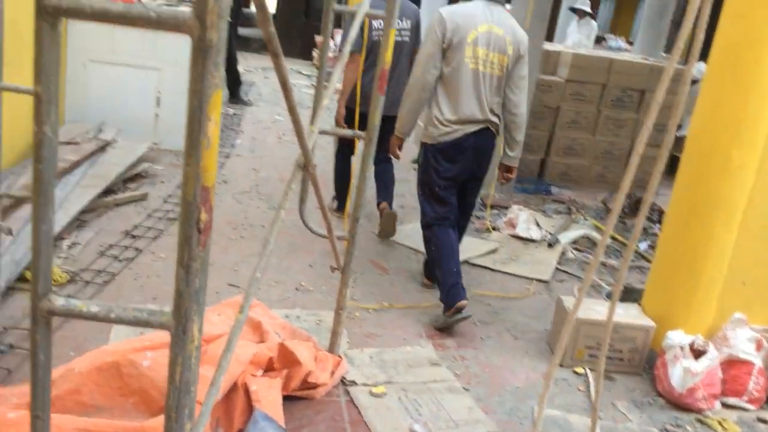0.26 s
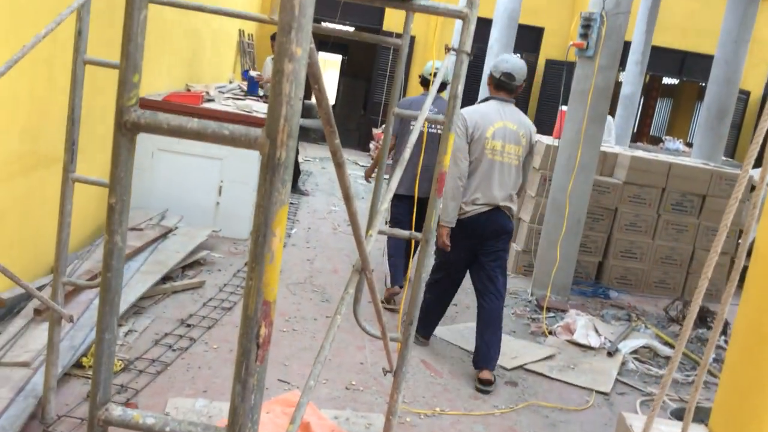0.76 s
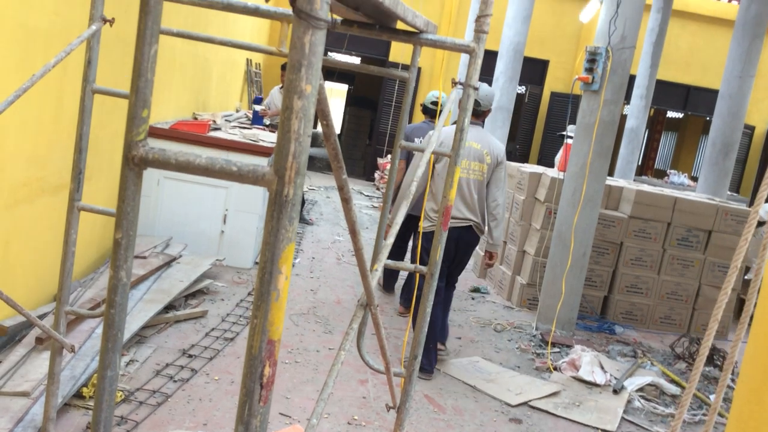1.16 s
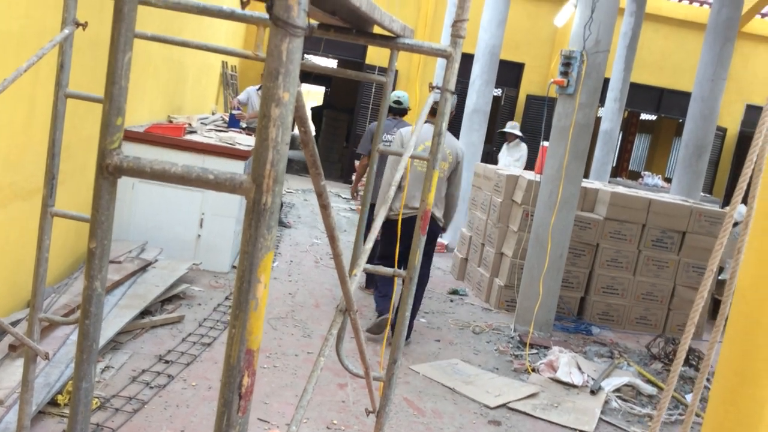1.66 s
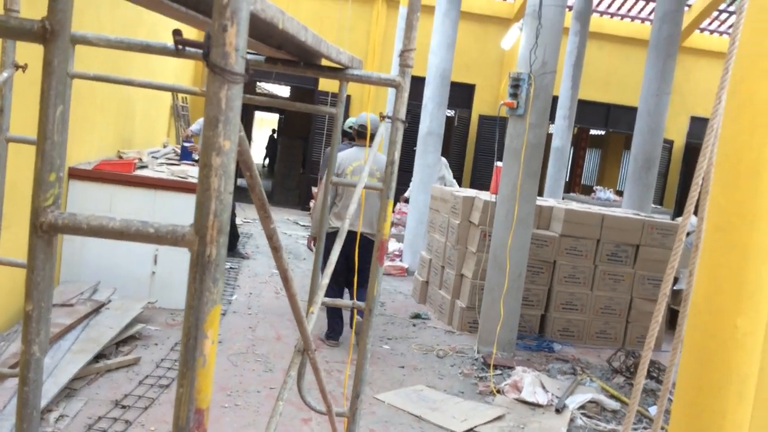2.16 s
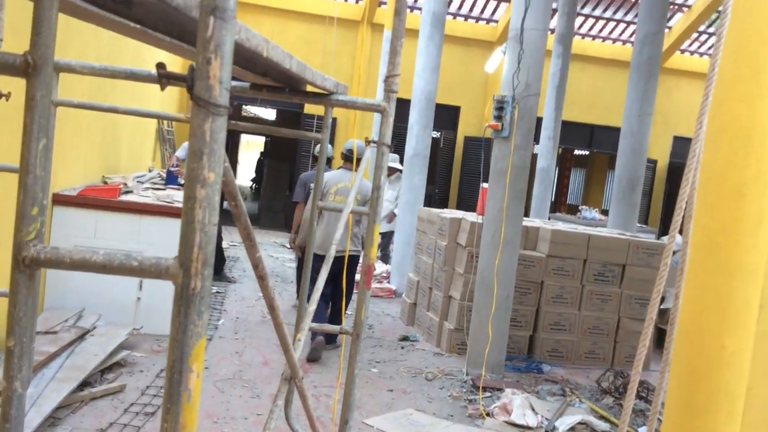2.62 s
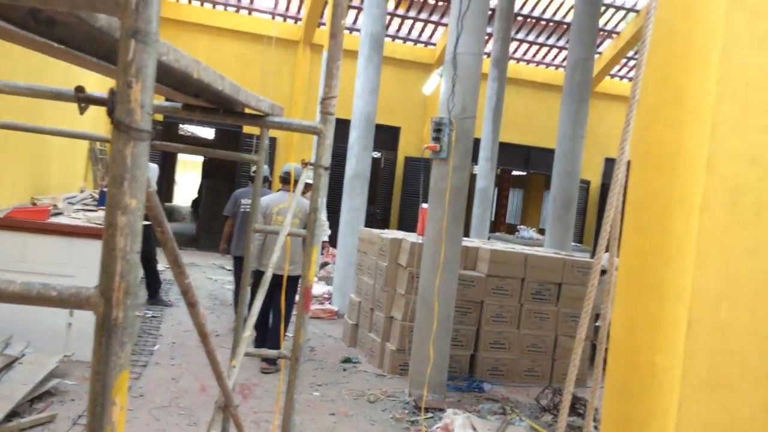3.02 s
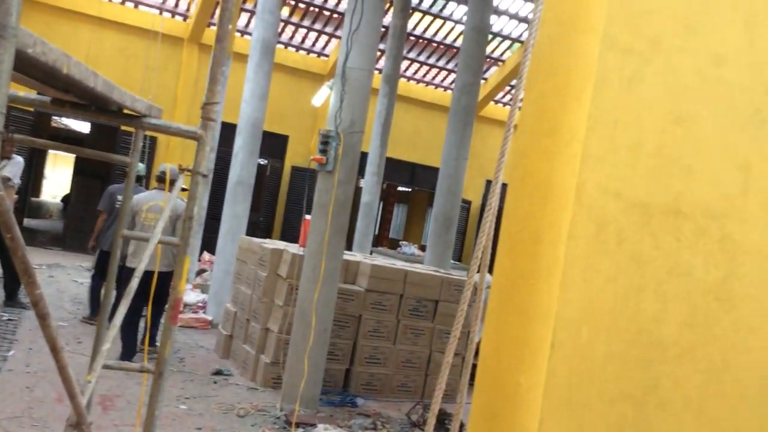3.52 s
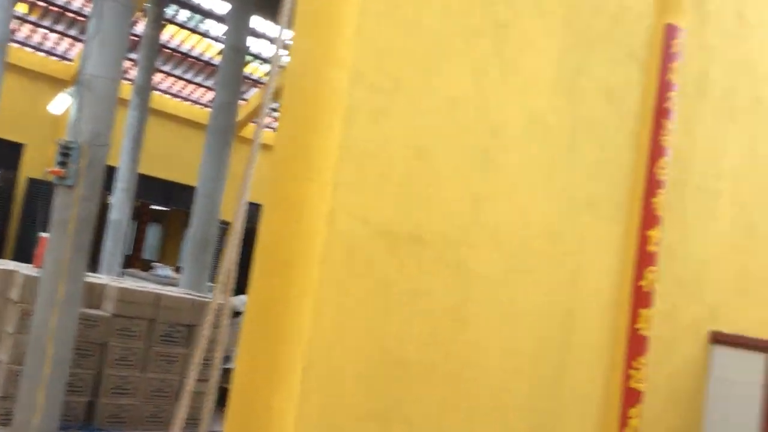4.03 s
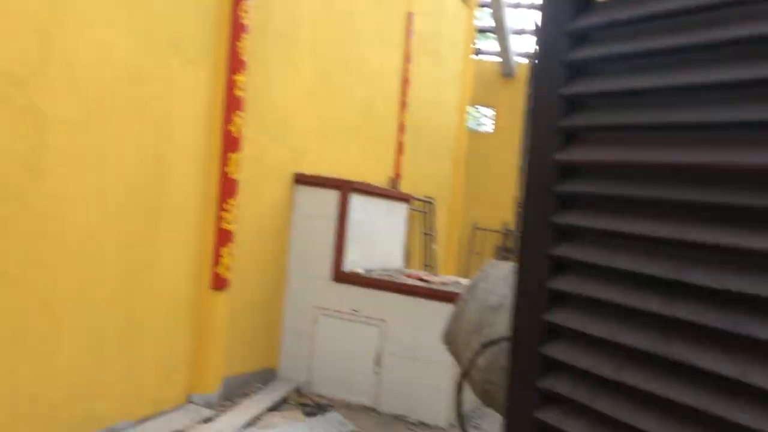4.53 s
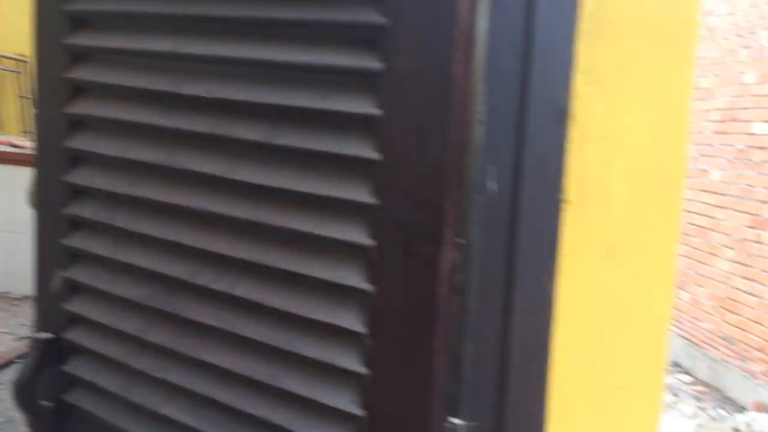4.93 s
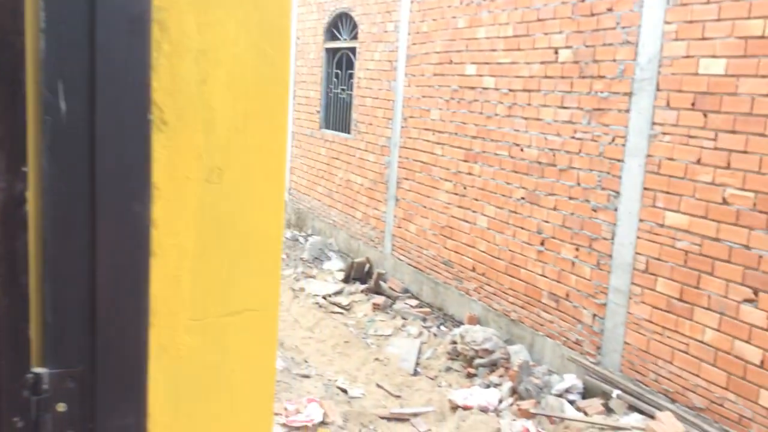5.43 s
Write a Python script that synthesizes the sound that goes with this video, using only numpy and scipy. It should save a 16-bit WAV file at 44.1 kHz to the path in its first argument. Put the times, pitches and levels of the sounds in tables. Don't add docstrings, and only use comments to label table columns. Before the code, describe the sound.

Hard-soled footsteps crunch over grit and broken tile in an echoing building site, loud at first, fainter midway, then sharp again at the end.

```python
import sys
import numpy as np
from scipy import signal
from scipy.fft import rfft, irfft
from scipy.io import wavfile
from scipy.ndimage import uniform_filter1d

SR = 44100
rng = np.random.default_rng(int(sys.argv[2]) if len(sys.argv) > 2 else 0)


def ratio_of_db(decibels):
    return 10 ** (np.asarray(decibels, float) / 20)


def put_to_file(sound):
    columns = np.atleast_2d(sound).T
    safe = np.clip(columns, -1, 1)
    whole_steps = np.round(safe * 32767)
    wavfile.write(sys.argv[1], SR, whole_steps.astype(np.int16))


N = 250488
SIZE = 32768
LEAD = 4096

# start in seconds, level in dB, crack in
# dB, grit in dB, landing spot across the tile (0-1).
SLAB_FOOTSTEPS = [
    (-0.0089, -12, -2, -6.5, 0.5),
                  (0.347, -6, 1, 6.1, 0.32),
    (0.67, -6, 0.5, .7, 0.27),
    (0.943, -10, -3.2, 5.2, 0.3),
    (1.624, -8.5, -1.2, 0.67, 0.485),
    (1.853, -12, -5, 5.8, .28),
]
FAR_STEPS = [
    (2.907, -19, -0.3, 0.54, 0.29),
    (3.176, -18.5, -0.5, 2.2, 0.29),
    (3.412, -18, -2, 2.1, 0.253),
]
SILL_STEP = [
    (4.761, -15, -1, 1.2, 0.15),
]
PASSAGE_STEPS = [
    (5.1495, -10.5, 3.5, 2.7, 0.388),
    (5.5118, -9.5, 2.4, 6.1, .335),
]

# frequency in Hz, level in dB per Hz.
SLAB_COLOUR = [(24, -30), (40, -18), (91, -20), (133, -11.5), (167, -2.5), (354, -7.5), (516, -5),
               (584, -7), (662, -3), (1040, -9), (1510, -8.5), (3640, -14.5), (7170, -31), (9440, -33.5),
               (16000, -52)]
FAR_COLOUR = [(24, -67), (40, -49), (155, -3), (283, -9.5), (391, -4.5), (455, -5.5), (1090, -9),
              (2320, -16), (2630, -15), (8330, -33), (16000, -52)]
PASSAGE_COLOUR = [(24, -38), (40, -22), (140, -4), (249, -5), (305, 5), (363, -1), (529, -1), (630, -8.5),
                  (1090, -8), (1810, -11.5), (2630, -7.5), (6010, -20.5), (6990, -20.5), (9210, -26.5),
                  (16000, -50)]

# frequency in Hz, width in Hz,
# height over the colour in dB when struck at an antinode.
SLAB_MODES = [(650, 43, 4.5), (900, 58, 8.5), (1106, 60, 7), (1227, 35, 11), (1500, 22, 2), (1707, 25, 7),
              (1925, 53, 7.5), (2093, 21, 10), (2257, 26, 7.5), (2664, 62, 6.5), (2980, 58, 7),
              (3634, 118, 10.5), (4170, 54, 0.5), (5750, 96, 10)]
FAR_MODES = [(400, 90, -2), (700, 24, 4.5), (1076, 60, 11), (1230, 50, 6), (1420, 78, 6), (1690, 49, 5),
             (2636, 45, 12.5), (3360, 40, 8), (4180, 120, 4), (5430, 45, 4)]
SILL_MODES = [(747, 90, 23.7), (1590, 81, 9.9), (2100, 110, 5), (3460, 68, 8), (4130, 170, 16),
              (5860, 65, 14)]
PASSAGE_MODES = [(548, 21, 11.4), (1100, 88, 8.6), (2190, 79, 11.6), (2553, 35, 12), (3900, 140, 13.8),
                 (4520, 85, 11), (4840, 81, 7.3), (5820, 98, 10), (6170, 83, 13)]

# frequency in Hz, level in dB, t60 in seconds, build-up in seconds.
SLAB_HOLLOW = [(169.6, -6, 0.39, 0.013), (193.1, -18, 0.6, 0.052), (149.7, -16.5, 0.59, 0.12)]
FAR_HOLLOW = [(140, -19, 0.26, 0.016), (230, -13, 0.19, 0.008)]
PASSAGE_HOLLOW = [(158, -8.5, 0.2, 0.0072), (231.3, -13, 0.38, 0.017)]

# frequency in Hz, t60 in seconds.
HALL_DECAY = [(100, 0.35), (260, 0.66), (700, 0.45), (1840, 0.62), (4850, 0.52), (12800, 0.3)]
FAR_DECAY = [(100, 0.26), (260, 0.89), (700, 0.63), (1840, 0.49), (4850, 0.095), (12800, 0.093)]
PASSAGE_DECAY = [(100, 0.97), (260, 0.38), (700, 0.37), (1840, 0.55), (4850, 0.36), (12800, 0.26)]

# crush over the echo in dB, crush t60 in seconds,
# heel touch in dB, heel centre in Hz.
SLAB_CONTACT = (3.5, 0.1526, -8.5, 500)
FAR_CONTACT = (3, 0.3842, -7, 500)
PASSAGE_CONTACT = (4, 0.09, -11.5, 2500)

# time in seconds, change in level in dB.
SITE_SWELL = [(0, 10), (.2, 3), (.33, 7.5), (1.3, 5), (1.55, 3.5), (2.3, -2), (2.58, -3), (2.7, 3.5),
              (2.88, -3.5), (3.7, 2), (3.95, 3), (4.15, -1.1), (4.3, -3), (4.55, 1.5), (4.72, -0.2),
              (5.1, 1), (5.35, 3.5), (5.68, 2)]
# frequency in Hz, level in dB per Hz.
SITE_COLOUR = [(15, -37), (25, 1.5), (70, 0.5), (170, -3), (270, -1.5), (502, -7.5), (961, -7.5),
               (1070, -8), (1990, -8.5), (3810, -13.5), (4490, -20.5), (9310, -21.5), (16000, -50)]
# frequency in Hz, share.
SWELL_SHARE = [(200, 0.28), (1200, 1.16), (6000, 0.76)]

# start in seconds, level in dB, centre in Hz.
GRAIN_TICKS = [
    (0.0844, -56, 6600),
    (0.2897, -47, 6300),
    (2.0153, -40.5, 7360),
    (2.3082, -56, 8100),
    (2.3401, -50, 9170),
    (2.3785, -54, 8470),
    (3.708, -59, 8700),
    (3.8477, -56, 9300),
    (4.3326, -57, 9450),
]
# start in seconds, level in dB, centre in Hz.
PITCHED_SHARDS = [
    (.3485, -20, 3700),
    (.358, -21, 3700),
    (.682, -19, 3700),
    (.692, -23, 3700),
    (1.634, -18, 800),
    (.6712, -14, 3200),
    (1.626, -32, 3640),
    (5.1497, -18.5, 4250),
    (5.5125, -20, 3900),
]
# start in seconds, level in dB, centre in Hz, scrape in seconds.
SOLE_DRAGS = [
    (.674, -30, 3900, 0.031),
    (2.62, -49, 3000, .08),
    (1.63, -30, 2400, .03),
    (1.87, -35, 8000, 0.04),
    (1.95, -34, 4300, .046),
    (5.17, -42.5, 5800, 0.23),
    (3, -48, 3100, 0.12),
    (5.53, -40, 5600, 0.11),
    (5.2, -36, 2700, .06),
]
# start in seconds, level in dB, centre in Hz.
BRIGHT_CHIPS = [(1.387, -40.5, 2910), (1.4644, -40.5, 2980), (2.175, -49.5, 3320), (2.4613, -48, 3500),
                (2.606, -42, 4910), (3.9486, -45, 2770), (4.0421, -37, 3570), (4.3794, -36, 3100),
                (4.6006, -48, 2910), (4.974, -51, 3210), (5.044, -44.5, 3180), (1.25, -55, 5760),
                (.6708, -33, 9000), (2.9085, -38, 5000), (1.607, -37.5, 5000)]
# start in seconds, level in dB, centre in Hz.
DRY_KNOCKS = [(1.182, -35, 980), (1.383, -32, 900), (1.631, -14.5, 1100), (.951, -21, 756),
              (3.418, -27.5, 1050), (1.906, -28, 1500), (1.935, -35, 1200), (1.966, -26, 900),
              (1.996, -34, 600), (2.606, -39.5, 1390), (4.379, -37.5, 1500)]
# start in seconds, level in dB, centre in Hz.
DULL_SCUFFS = [(1.179, -26.5, 414), (1.382, -30.5, 456), (1.789, -26, 775), (2.604, -38.5, 650),
               (4.377, -28.5, 169), (4.41, -38, 252), (4.47, -45, 198), (4.764, -25, 170), (1.26, -40, 200),
               (4.97, -42, 203), (1.382, -32.5, 211), (2.608, -35.5, 178)]
# start in seconds, level in dB, centre in Hz.
TOE_TOUCHES = [
    (1.601, -27, 450),
    (1.609, -25, 900),
    (3.393, -29, 1000),
]

# width in octaves, scrape in seconds, hall in dB.
SCUFF_KIND = (0.94, 0.0096, -14)
CHIP_KIND = (1.36, 0.0095, -9.5)
TICK_KIND = (.75, .0045, -11.5)
TOE_KIND = (0.59, 0.0099, -3)
KNOCK_KIND = (0.77, 0.0083, -12)
SHARD_KIND = (0.32, 0.0054, -21)

# start in seconds, length in seconds, first pitch in Hz, held pitch in Hz, level in dB.
BIRD_CALLS = [
    (4.55, .2, 9250, 9450, -73),
    (4.645, .09, 5900, 4950, -64),
]


def on_log_axis(hz, points):
    f, v = np.transpose(points)
    return np.interp(np.log(hz + 1), np.log(f), v)


def causal(gain_db):
    cepstrum = irfft(gain_db * np.log(10) / 20)
    cepstrum[1:SIZE // 2] *= 2
    cepstrum[SIZE // 2 + 1:] = 0
    return np.exp(rfft(cepstrum))


def band(x, hz, octaves):
    f = np.fft.rfftfreq(len(x), 1 / SR)
    bell = np.exp(-(np.log2((f + 1) / hz) / octaves) ** 2)
    return irfft(rfft(x) * bell, len(x))


def walk(rate):
    k = int(SR / rate)
    held = np.repeat(rng.standard_normal(N // k + 1), k)
    return uniform_filter1d(uniform_filter1d(held, k), k)[:N]


def unit(sound):
    return sound / np.sqrt(np.mean(sound[:SR // 40] ** 2))


def add(track, s, sound):
    i = LEAD + int(s * SR)
    track[i:i + len(sound)] += sound


def crush(crush_db, t60):
    t = np.arange(SIZE) / SR
    snap = 60
    chance = rng.random((3, SIZE))
    happens = chance[0] < 4000 / SR
    cracks = happens * ratio_of_db(-1.6 * np.log(chance[1] + 1e-9)) * np.sign(chance[2] - 0.5)
    cracks *= 1 + 0.85 * np.exp(-t / 0.0094)
    cracks[:snap] *= 0.08
    cracks[snap] = 2.2
    return 3 * cracks * ratio_of_db(crush_db - 60 * t / t60)


def echo(decays, stretch, noise):
    t, tail = np.arange(SIZE) / SR, 0
    for hz in 60 * 2 ** np.arange(0, 8.5, 0.5):
        t60 = stretch * on_log_axis(hz, decays)
        build_up = 1 - np.exp(-t / (0.00084 + 3 / hz))
        tail = tail + band(noise, hz, 0.38) * ratio_of_db(-60 * t / t60) * build_up
    return tail


def boom(hollow, thud_db):
    t, out = np.arange(SIZE) / SR, 0
    for (hz, db, t60, rise), (detune, turn) in zip(hollow, rng.random((len(hollow), 2))):
        phase = 2 * np.pi * (hz * (1 + 0.045 * (detune - 0.5)) * t + turn)
        swell = 1 - np.exp(-(t / rise) ** 2)
        out = out + ratio_of_db(db + thud_db - 60 * t / t60) * swell * np.sin(phase)
    return out


def ring(modes, spot, hz):
    power = 0
    for k, (f, width, top_db) in enumerate(modes):
        movement = np.sin(np.pi * (k + 1) * spot) ** 2
        peak = 1 / (1 + (2 * (hz - f) / (2.16 * width)) ** 2) ** 2
        power = power + ratio_of_db(2 * top_db) * movement * peak
    return 10 * np.log10(1 + power)


def heel_brush(heel_hz):
    size = 400
    return band(rng.standard_normal(size), heel_hz, 1.5) * np.linspace(0, 1, size) ** 2


def steps(rows, colour, modes, hollow, decays, contact):
    track, hz = np.zeros(LEAD + N + SIZE), np.fft.rfftfreq(SIZE, 1 / SR)
    crush_db, crush_t60, heel_db, heel_hz = contact
    place = rng.standard_normal(SIZE)
    direct_db = on_log_axis(hz, [(1200, 0), (3600, 1.9), (6000, 2.4), (12000, 1.9)])
    for s, db, crack_db, grit_db, spot in rows:
        thud_db, stretch = 1.77 - 0.23 * crack_db, 1 - 0.0477 * crack_db
        effort_db = on_log_axis(hz, [(170, thud_db), (750, 0.0077), (3900, crack_db), (9000, grit_db)])
        colour_db = on_log_axis(hz, colour) + effort_db
        ring_db = ring(modes, spot, hz)
        tail = echo(decays, stretch, 0.65 * place + 0.76 * rng.standard_normal(SIZE))
        direct = rfft(crush(crush_db, crush_t60)) * causal(colour_db + direct_db + ring_db)
        returned = rfft(tail) * causal(colour_db + 0.3 * ring_db)
        blow = unit(irfft(direct + returned))
        add(track, s, ratio_of_db(db - 8.5) * (blow + boom(hollow, thud_db)))
        heel = heel_brush(heel_hz)
        add(track, s - len(heel) / SR, ratio_of_db(db + heel_db) * heel)
    return track


def site():
    swell_db, out = np.interp(np.arange(N) / SR, *np.transpose(SITE_SWELL)), 0
    for hz in 30 * 2 ** np.arange(0, 9.5, 0.5):
        db = on_log_axis(hz, SITE_COLOUR) + on_log_axis(hz, SWELL_SHARE) * swell_db + 1.6 * walk(5.78)
        out = out + ratio_of_db(db - 39) * band(rng.standard_normal(N), hz, 0.44)
    return out


def scraps(rows, kind):
    track, hz, t = np.zeros(LEAD + N + SIZE), np.fft.rfftfreq(SIZE, 1 / SR), np.arange(SIZE) / SR
    octaves, scrape_s, hall_db = kind
    for s, db, centre_hz in rows:
        noise = rng.standard_normal((3, SIZE))
        scrape = np.exp(-t / scrape_s) * (1 - np.exp(-t / scrape_s * 14))
        grains = noise[0] * noise[1] * scrape
        hall = ratio_of_db(hall_db - 60 * t / 0.54) * (1 - np.exp(-t / 0.0082)) * noise[2]
        bell_db = -9 * (np.log2((hz + 1) / centre_hz) / octaves) ** 2
        colour = causal(np.maximum(bell_db, -60))
        add(track, s, ratio_of_db(db - 10) * unit(irfft(rfft(grains + hall) * colour)))
    return track


def drags():
    track = 0
    for s, db, hz, scrape_s in SOLE_DRAGS:
        track = track + scraps([(s, db, hz)], (1, scrape_s, -16))
    return track


def bird():
    t, out = np.arange(N) / SR, 0
    glide_s, fade_s, blur_hz = 0.03, 0.018, 260
    for s, length, first_hz, held_hz, db in BIRD_CALLS:
        fade = np.clip(np.minimum(t - s, s + length - t) / fade_s, 0, 1)
        glide = np.exp(-np.maximum(t - s, 0) / glide_s)
        hz = held_hz + (first_hz - held_hz) * glide + blur_hz * walk(300)
        out = out + np.sqrt(2) * fade * ratio_of_db(db) * np.sin(2 * np.pi * np.cumsum(hz) / SR)
    return out


def scene():
    feet = steps(SLAB_FOOTSTEPS, SLAB_COLOUR, SLAB_MODES, SLAB_HOLLOW, HALL_DECAY, SLAB_CONTACT)
    feet += steps(FAR_STEPS, FAR_COLOUR, FAR_MODES, FAR_HOLLOW, FAR_DECAY, FAR_CONTACT)
    passage = PASSAGE_HOLLOW, PASSAGE_DECAY, PASSAGE_CONTACT
    feet += steps(SILL_STEP, PASSAGE_COLOUR, SILL_MODES, *passage)
    feet += steps(PASSAGE_STEPS, PASSAGE_COLOUR, PASSAGE_MODES, *passage)
    feet += scraps(GRAIN_TICKS, TICK_KIND)
    feet += scraps(PITCHED_SHARDS, SHARD_KIND)
    feet += drags()
    feet += scraps(BRIGHT_CHIPS, CHIP_KIND)
    feet += scraps(DRY_KNOCKS, KNOCK_KIND)
    feet += scraps(DULL_SCUFFS, SCUFF_KIND)
    feet += scraps(TOE_TOUCHES, TOE_KIND)
    return (feet[LEAD:LEAD + N] + site() + bird())[None]


def roll_off(x):
    return signal.sosfilt(signal.butter(12, 16130, fs=SR, output="sos"), x)


def record(dry):
    rounded = 0.87 * np.tanh(dry / 0.74)
    no_rumble = signal.sosfilt(signal.butter(2, 45, "high", fs=SR, output="sos"), rounded)
    mix = signal.sosfilt(signal.ellip(8, 0.3, 40, 16050, fs=SR, output="sos"), no_rumble)
    return roll_off(mix)


dry = scene()
out = record(dry)
put_to_file(out)
```